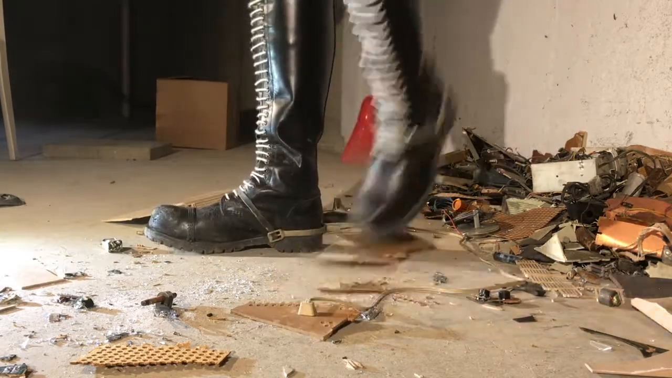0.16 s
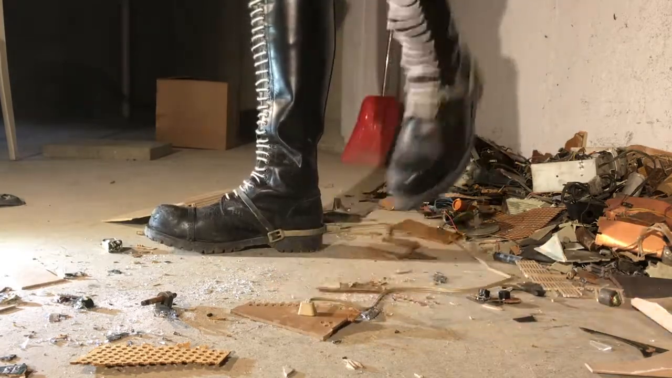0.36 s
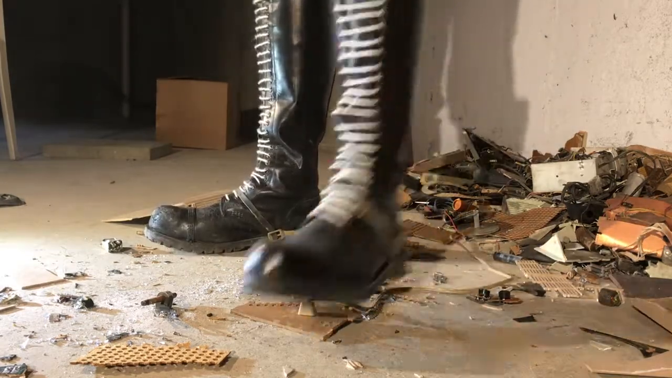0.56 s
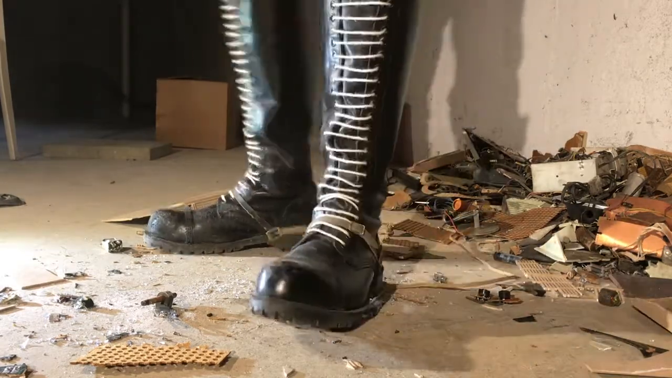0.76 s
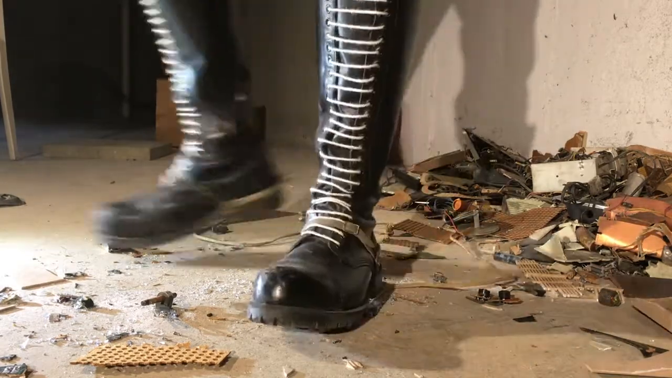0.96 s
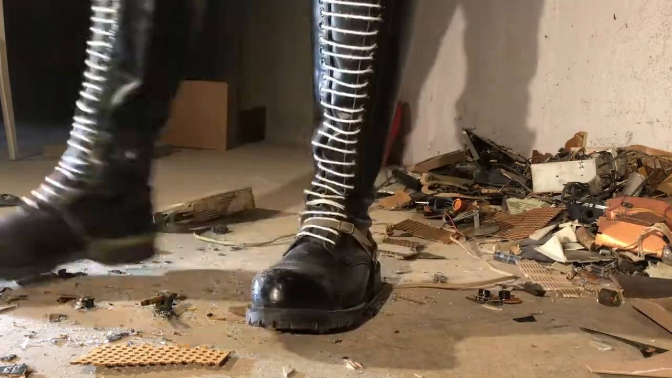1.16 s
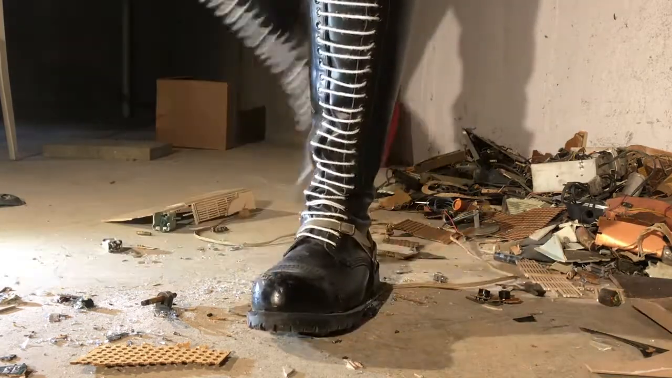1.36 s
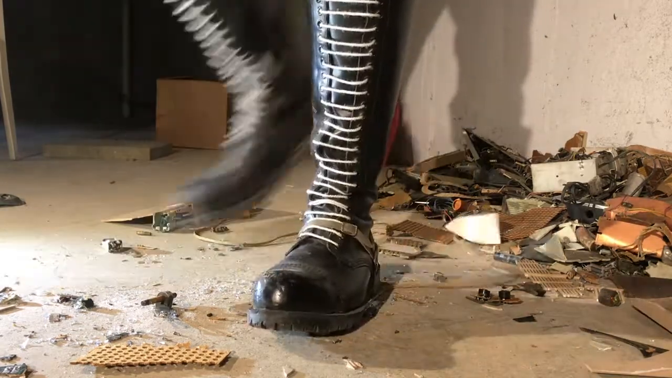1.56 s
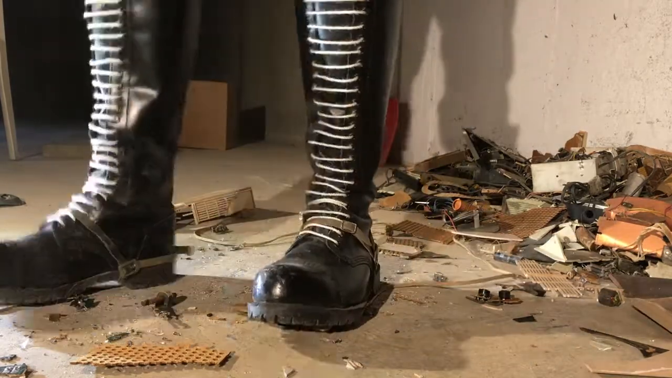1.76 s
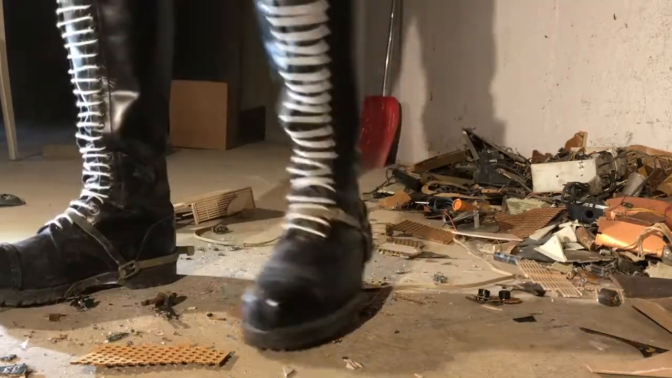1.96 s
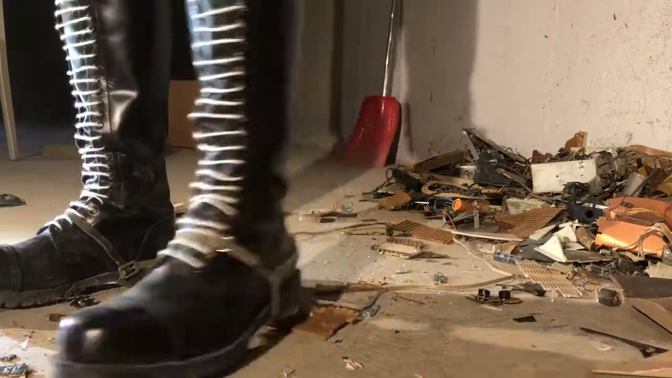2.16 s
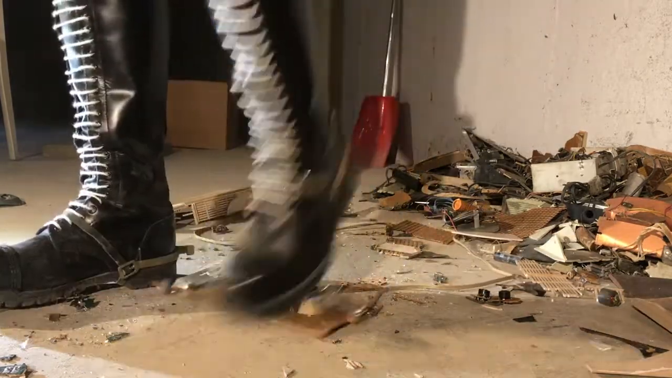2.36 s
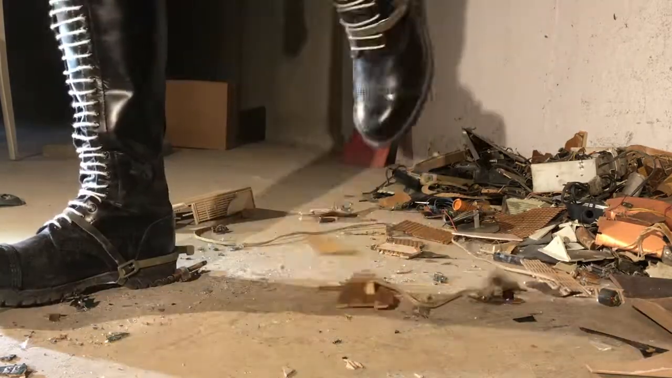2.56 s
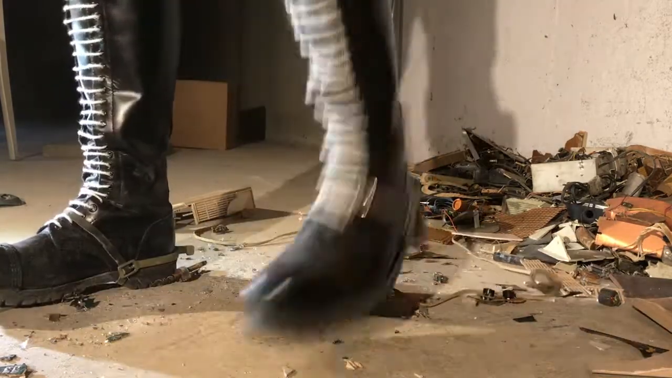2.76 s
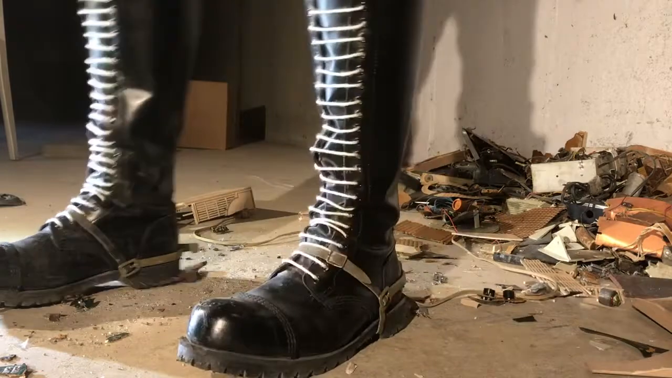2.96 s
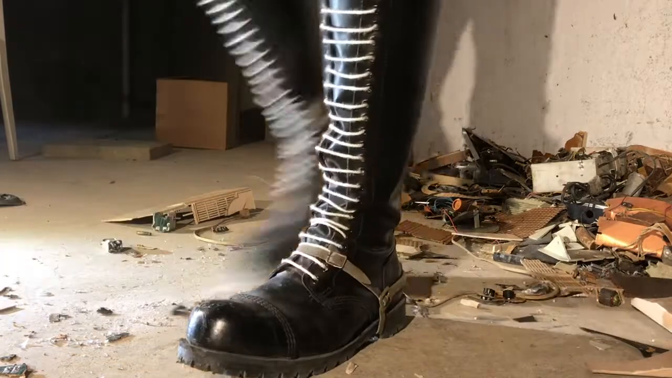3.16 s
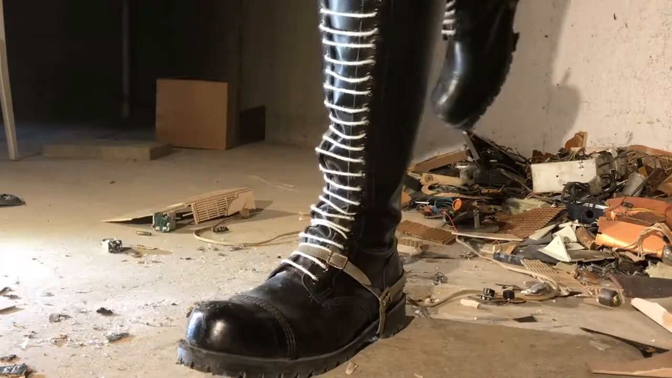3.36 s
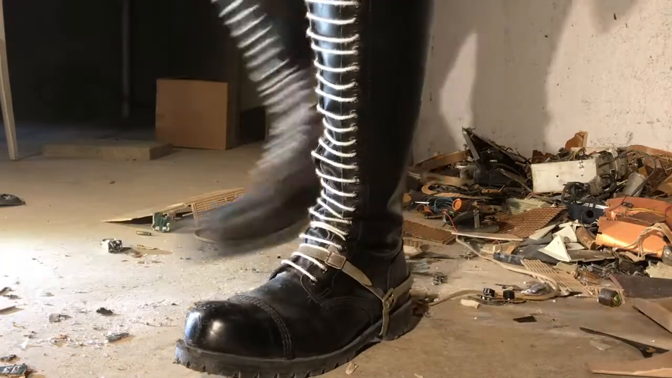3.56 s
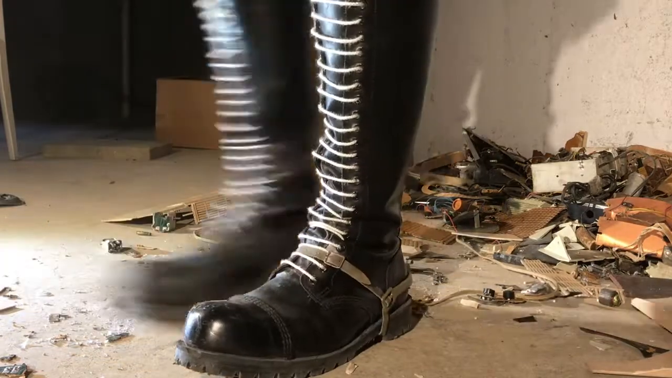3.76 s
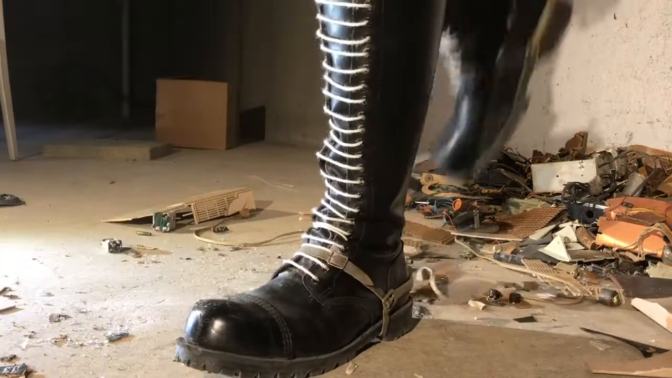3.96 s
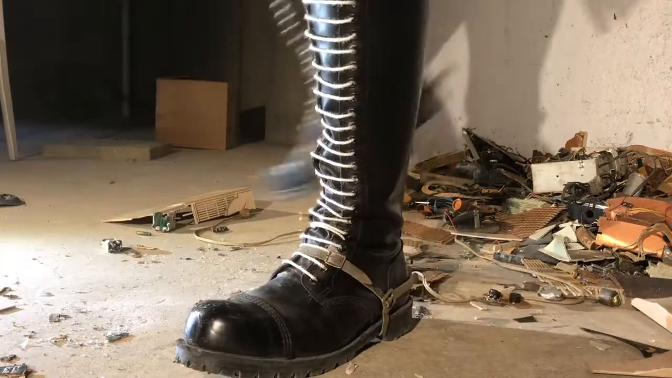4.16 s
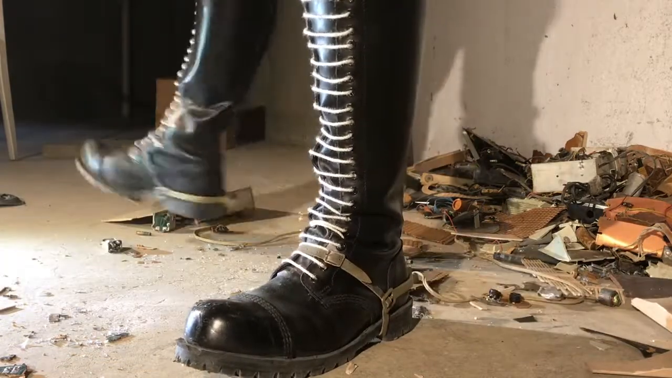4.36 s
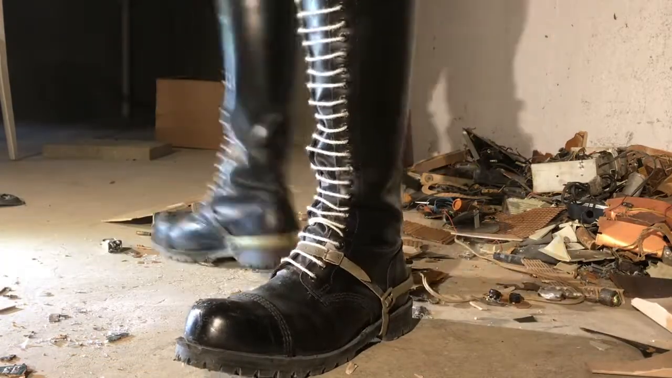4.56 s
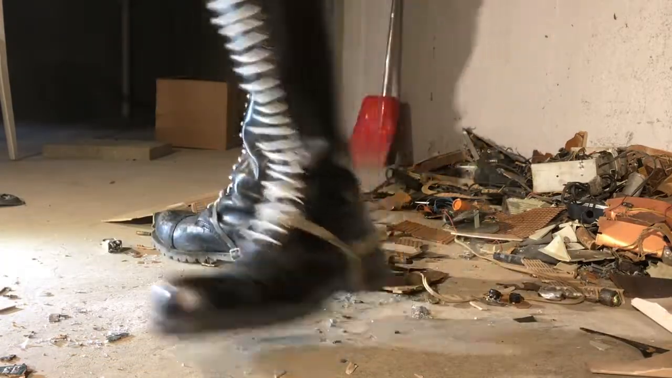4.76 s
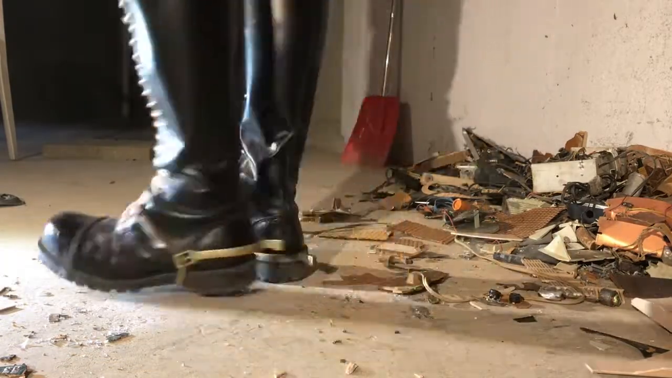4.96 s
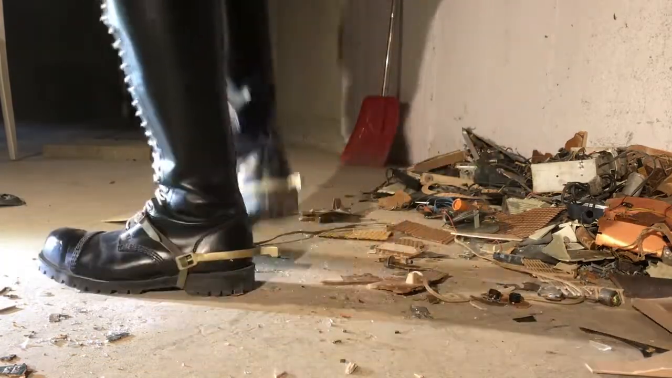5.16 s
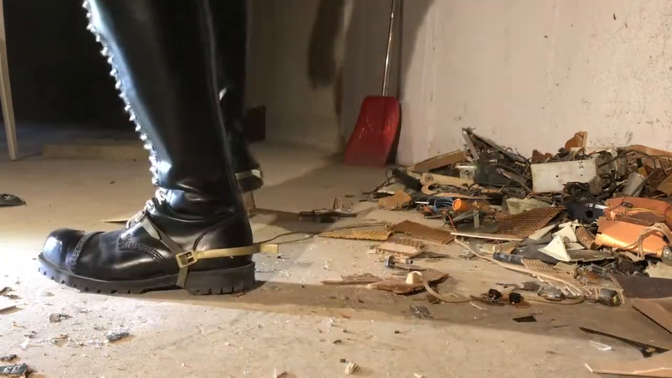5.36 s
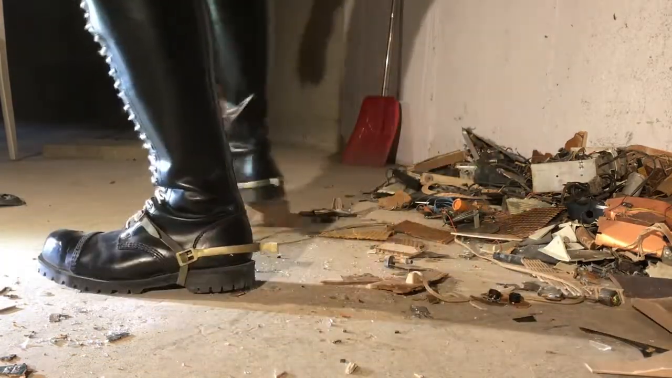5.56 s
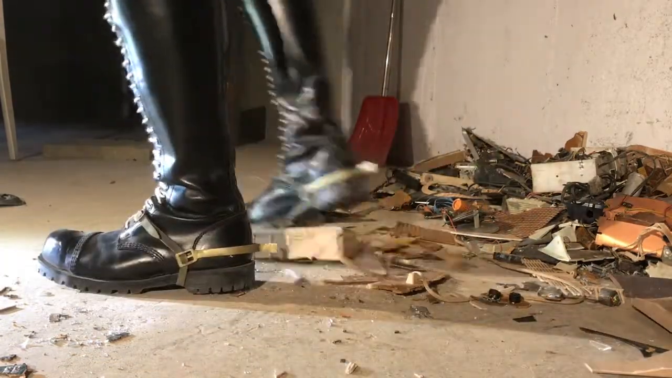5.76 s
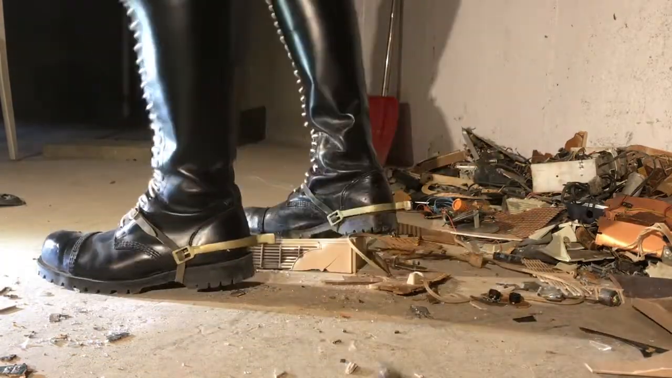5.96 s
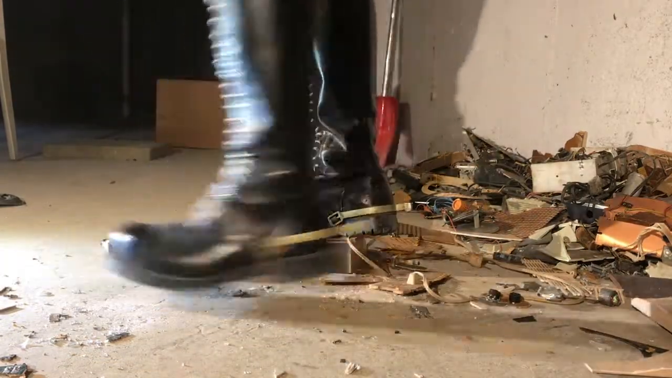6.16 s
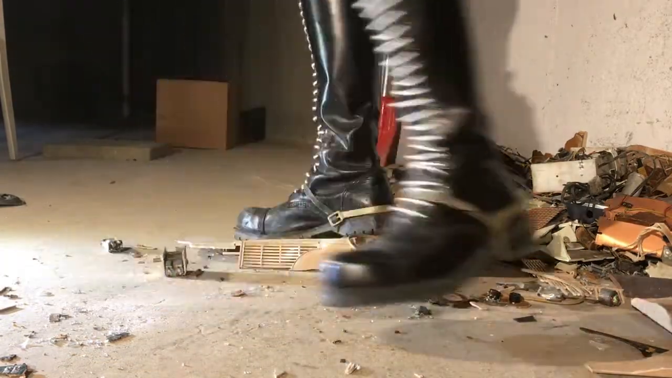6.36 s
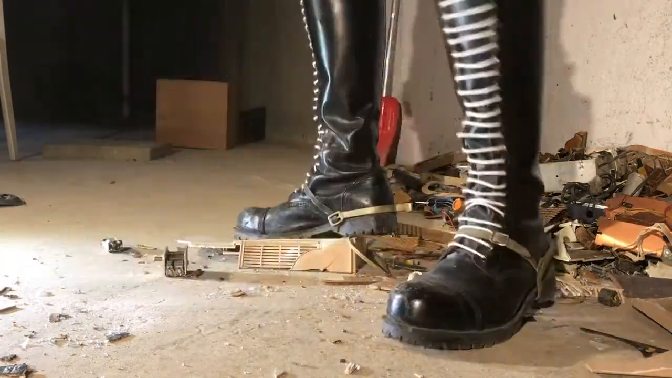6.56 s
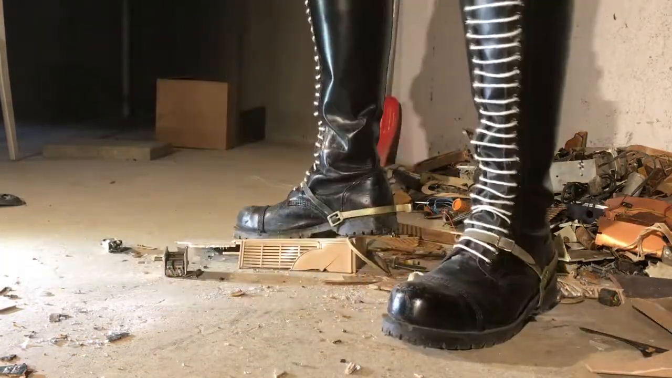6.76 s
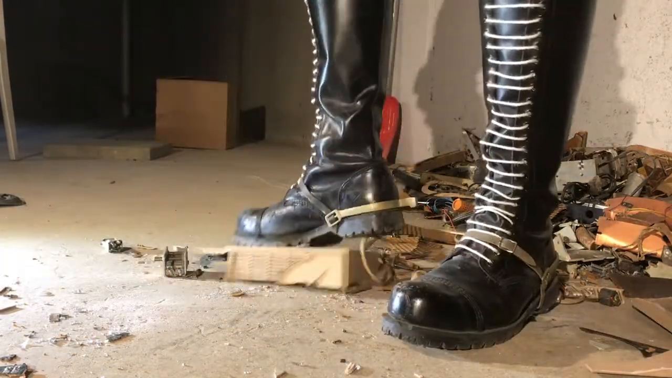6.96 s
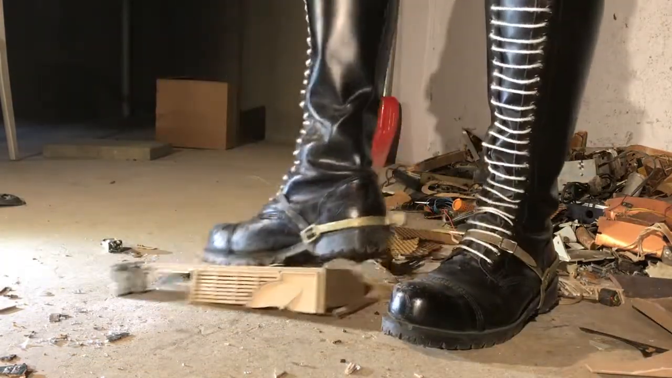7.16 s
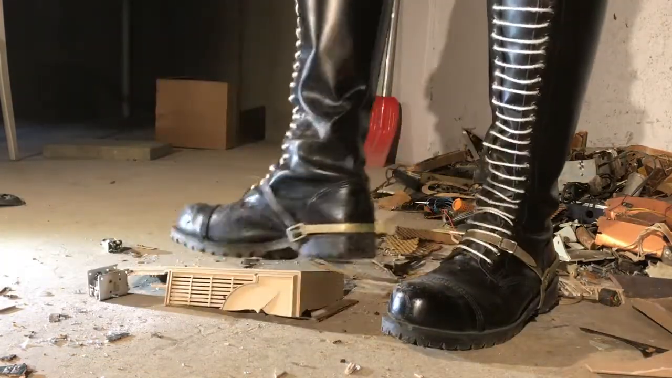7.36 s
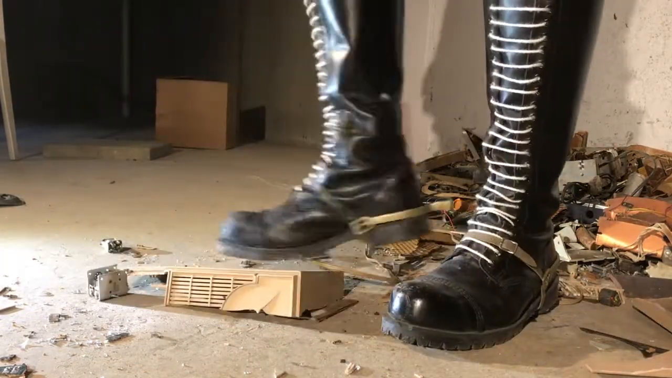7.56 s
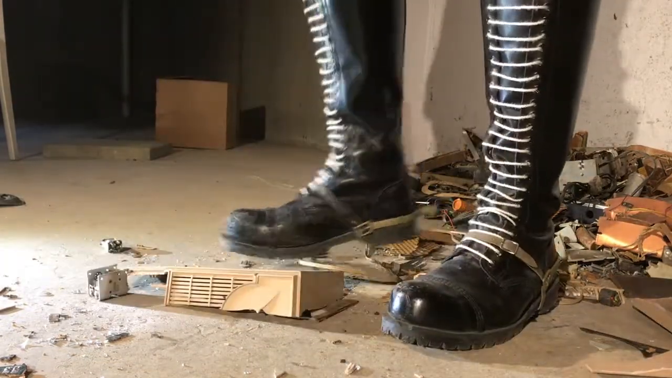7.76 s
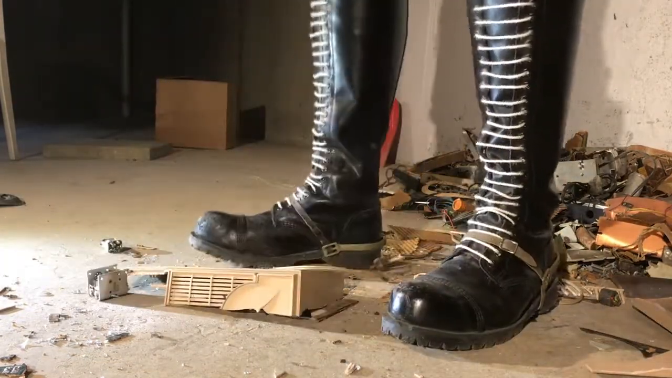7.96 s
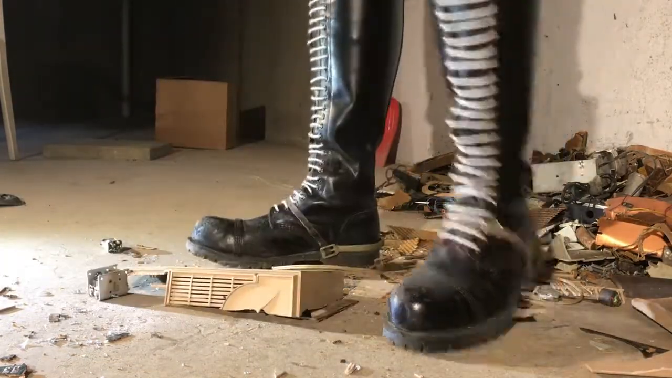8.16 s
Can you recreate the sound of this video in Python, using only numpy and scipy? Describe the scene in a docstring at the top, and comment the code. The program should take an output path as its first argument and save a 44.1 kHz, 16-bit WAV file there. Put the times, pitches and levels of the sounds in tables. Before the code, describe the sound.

Close to a concrete floor in a bare cellar, heavy rubber-soled boots thud and grind brittle plastic shards. Bright snaps and clicks scatter irregularly, crumbs skitter after kicks, and a metal bracket clatters early on. Later a small screw tinkles, then a hollow plastic case is dragged twice in stuttering scrapes. The end grows quiet. Short room tail, faint hum and hiss.

```python
"""Heavy boots step, scuff and kick among brittle plastic shards on a concrete floor in a bare cellar.
Sharp clicks of shards, heels, case and metal are noise bursts through resonators; soles thud as decaying
sines and grind as clumped grains. Small metal parts tinkle as struck modes; a hollow plastic case is
dragged twice, its shell and edge driven by stuttering contacts. A floor echo and diffuse tail form the
room; mains hum and hiss lie below."""
import sys
import numpy as np
from scipy import signal
from scipy.fft import rfft, irfft
from scipy.io import wavfile

SR = 44100
rng = np.random.default_rng(int(sys.argv[2]) if len(sys.argv) > 2 else 0)


def to_wav(sig):
    """Store sig (one row per channel, or 1-D mono) as 16-bit WAV at the path in sys.argv[1].

    Samples outside -1..1 are clipped; the rate is SR.
    """
    pcm = np.clip(np.atleast_2d(sig), -1, 1) * 32767
    pcm = np.round(pcm).astype(np.int16)
    wavfile.write(sys.argv[1], SR, pcm.T)  # frames by channels


N = 362061


def amp(db):
    """Amplitude factor of a level in dB."""
    return 10 ** (np.asarray(db) / 20)


def rms_one(x):
    """Scale to rms 1."""
    return x / np.sqrt(np.mean(x ** 2) + 1e-20)


def band(x, lo_hz, hi_hz):
    """Butterworth band-pass."""
    sos = signal.butter(2, [lo_hz, min(hi_hz, .45 * SR)], "band", fs=SR, output="sos")
    return signal.sosfilt(sos, x)


def high_pass(x, order, cutoff_hz):
    """Butterworth high-pass."""
    return signal.sosfilt(signal.butter(order, cutoff_hz, "high", fs=SR, output="sos"), x)


def colour(x, spectrum):
    """Shape by points (freq_hz, gain_db), interpolated over log frequency; rms 1."""
    bins_hz = np.fft.rfftfreq(N, 1 / SR) + 1
    freq_hz, gain_db = np.array(spectrum).T
    gain = amp(np.interp(np.log(bins_hz), np.log(freq_hz), gain_db))
    return rms_one(irfft(rfft(x) * gain, N))


def resonance(x, freq_hz, width_hz):
    """Two-pole resonator, gain 1 on top."""
    r = np.exp(-np.pi * width_hz / SR)
    zeros = np.array([1, 0, -1]) * (1 - r * r) / 2
    poles = [1, -2 * r * np.cos(2 * np.pi * freq_hz / SR), r * r]
    return signal.lfilter(zeros, poles, x)


def grains(per_s, spread_db, clump_db, clump_hz):
    """Random micro-contacts of uneven size that come in clumps; rms 1."""
    clumps = amp(clump_db * rms_one(band(rng.standard_normal(N), 8.0, clump_hz)))
    sizes = amp(spread_db * np.minimum(rng.exponential(1, N), 4)) * rng.standard_normal(N)
    struck = rng.random(N) < per_s / SR
    return rms_one(clumps * sizes * struck)


def crumbs(per_s, spread_db, q):
    """Separate tiny impacts: a dry tick, and a brief ring of one of 24 small fragments; rms 1."""
    taps = grains(per_s, spread_db, 3.0, 40)
    fragment = rng.integers(0, 24, N)
    pitches_hz = np.geomspace(2500, 14500, 24)
    # 1e-18 keeps the filters out of denormals
    rings = sum(resonance(taps * (fragment == k) + 1e-18, hz, hz / q) for k, hz in enumerate(pitches_hz))
    ticks = band(taps, 3200, 25000)
    return rms_one(rms_one(rings) + rms_one(ticks))


def add(out, start_s, burst, peak_db):
    """Lay a burst at start_s with the given peak."""
    i = round(start_s * SR)
    burst = burst[:N - i]
    out[i:i + len(burst)] += amp(peak_db) * burst / np.max(np.abs(burst))


# hiss spectrum: freq_hz, gain_db (relative)
HISS_SPECTRUM = [(25, -22), (70, 2.5), (98, -3), (250, -9), (700, -11.5), (2500, -21), (5000, -21),
                 (7500, -22.5), (8600, -20), (10300, -26.5), (15800, -22)]
HISS_RMS_DB = -57
HUM_HZ, HUM_RMS_DB = 120.6, -63.5


def background():
    """Steady hiss and rumble as coloured noise, mains hum as one sine."""
    hum = np.sqrt(2) * np.sin(2 * np.pi * HUM_HZ * np.arange(N) / SR)
    hiss = colour(rng.standard_normal(N), HISS_SPECTRUM)
    return amp(HISS_RMS_DB) * hiss + amp(HUM_RMS_DB) * hum


ROOM_T60_S, TAIL_DB = 0.39, -10.5   # tail energy re direct
TREBLE_T60_S, TREBLE_HZ = 0.24, 6000   # the walls soak up the treble sooner
FLOOR_ECHO_S, FLOOR_ECHO_DB = .003, -24


def room(x):
    """An echo off the floor, and a diffuse tail that builds over the first reflections."""
    t = np.arange(SR // 2) / SR
    noise = rng.standard_normal(SR // 2)
    tail = band(noise, 90, TREBLE_HZ) * amp(-60 * t / ROOM_T60_S)
    tail += band(noise, TREBLE_HZ, 21000) * amp(-60 * t / TREBLE_T60_S)
    tail *= 1 - np.exp(-(t / 0.004) ** 2)
    response = amp(TAIL_DB) * tail / np.sqrt(np.sum(tail ** 2))
    response[0] = 1
    response[round(FLOOR_ECHO_S * SR)] += amp(FLOOR_ECHO_DB)
    return signal.fftconvolve(x, response)[:N]


# small screw bouncing to rest: start_s, hit_db
SCREW_HITS = [(4.1832, -35), (4.2305, -46), (4.2767, -53), (4.315, -61)]
# its modes: freq_hz, mode_db, t60_s
SCREW_MODES = [(2900, -21, 0.28), (4850, -10, 0.064), (5570, -7, 0.11), (6260, -3, 0.11), (7600, -4, 0.14),
               (8500, 1, 0.12), (12420, -6, .08)]
# small metal part struck once: start_s, hit_db
SMALL_PART_HITS = [(3.7439, -36)]
# its modes: freq_hz, mode_db, t60_s
SMALL_PART_MODES = [(2630, -23, 0.12), (4830, -10, 0.08), (3670, -17.5, .08), (11400, 4, .06),
                    (6080, -6, 0.11), (6650, 11.5, 0.1), (9000, 7, 0.15), (9750, 3, 0.068),
                    (10880, 5, 0.087), (12890, 8, 0.075), (14560, -5.5, 0.09)]


def metal(hits, modes):
    """Each touch strikes every mode with a strength of its own; bent parts split each mode in two."""
    out = np.zeros(N)
    at = [round(start_s * SR) for start_s, _ in hits]
    hits_db = np.array(hits)[:, 1]
    luck_db = rng.normal(0, 3, (len(hits), 2 * len(modes)))
    twins = [(hz * 1.013, db - 4, t60_s * .7) for hz, db, t60_s in modes]
    for k, (freq_hz, mode_db, t60_s) in enumerate(modes + twins):
        clicks = np.full(N, 1e-18)
        clicks[at] = amp(hits_db + mode_db + luck_db[:, k])
        r, w = amp(-60 / (t60_s * SR)), 2 * np.pi * freq_hz / SR
        out += signal.lfilter([0, np.sin(w)], [1, -2 * r * np.cos(w), r * r], clicks)
    return out


# main hits of a kicked metal bracket: start_s, hit_db
BRACKET_HITS = [(1.3818, -30), (1.4194, -35), (1.5449, -33.5), (1.6415, -34.5), (1.698, -33.5)]
# its modes: freq_hz, mode_db, t60_s
BRACKET_MODES = [(1000, -21, .2), (1720, -6.5, 0.15), (2360, -11.5, 0.11), (5200, -19, 0.073),
                 (1970, -17, 0.11), (2820, -7.5, 0.14), (3660, -0.5, 0.11), (3830, -6, .12),
                 (4600, -16, .1), (5700, 0, .1), (6500, -3.5, 0.13), (8683, -8.5, 0.12)]


def tumble():
    """Hits of the bracket: between the main ones it keeps touching the floor lightly."""
    times_s = np.sort(rng.uniform(1.3, 1.8, 36))
    touches = [(s, -43 - 14 * (s - 1.3) - rng.exponential(4)) for s in times_s]
    return list(BRACKET_HITS) + touches


# hollow case over the floor, one list per drag: start_s, shell_db, edge_db
DRAGS = [
    [(5.493, -37, -38), (5.512, -22, -34.5), (5.595, -17, -24.5), (5.65, -14, -20), (5.73, -16, -20.5),
     (5.80, -20, -19.5), (5.87, -21.5, -29.5), (5.925, -45, -41.5), (6.04, -47, -38)],
    [(6.845, -44, -52.5), (6.89, -44, -43.5), (6.965, -18, -20.5), (7.13, -25.5, -30), (7.19, -27.5, -27),
     (7.215, -18, -24.5), (7.29, -26, -27.5), (7.35, -42, -35), (7.38, -48.5, -73), (7.43, -66, -62)],
]
# the edge catches and jumps: start_s, edge_db, shell_db, t60_s
JOLTS = [(5.509, -33.5, -15, 0.041), (5.6, -11.5, -17.5, 0.11), (5.69, -15, -21, 0.085),
         (5.81, -15.5, -39.5, 0.21), (5.933, -6.5, -3, 0.056), (6.94, -14.5, -25.5, 0.048),
         (6.957, -16, -23, 0.099), (6.995, -21, -23.5, .15), (7.025, -21, -31, 0.1),
         (7.07, -13.5, -21.5, 0.054), (7.1, -17, -24, 0.13), (7.21, -28.5, -31, 0.54)]
JOLT_RISE_S = .002
# shell resonances: freq_hz, width_hz, gain_db
CASE_MODES = [(132, 40, -16), (250, 52, -10), (436.4, 50, -8), (513, 33, -5), (694.5, 97, -1), (874, 62, 4),
              (966.5, 32.6, 3), (1139, 65, 1.5), (1424, 240, -11.5), (1830, 67, -4)]
# edge hiss spectrum: freq_hz, gain_db (relative)
EDGE_SPECTRUM = [(880, -43.5), (1500, -0.5), (3380, -0.5), (6360, -6), (7390, -11), (8600, -4),
                 (10300, -8.5), (15100, -6), (16000, -23.5), (16500, -29)]
CHATTER_SHARE = 0.46   # loose bits rattling on the dragged edge, re its hiss


def drags():
    """The case's edge stutters on the concrete: the same contacts, with coarser ones, hiss and drive the shell."""
    t = np.arange(N) / SR
    edge, shell = np.zeros((2, N))
    for rows in DRAGS:
        start_s, shell_db, edge_db = np.transpose(rows)
        edge += amp(np.interp(t, start_s, edge_db, left=-200, right=-200))
        shell += amp(np.interp(t, start_s, shell_db, left=-200, right=-200))
    for start_s, edge_db, shell_db, t60_s in JOLTS:
        jolt = np.clip((t - start_s) / JOLT_RISE_S, 0, 1) * amp(-60 * np.clip(t - start_s, 0, 1) / t60_s)
        edge += amp(edge_db) * jolt
        shell += amp(shell_db) * jolt
    contacts = grains(7000, 2.0, 2.0, 80) + .4 * grains(120, 2.5, 2.0, 30)
    body = np.zeros(N)
    for k, (freq_hz, width_hz, gain_db) in enumerate(CASE_MODES):
        body += (-1) ** k * amp(gain_db) * resonance(contacts, freq_hz, width_hz)
    chatter = colour(crumbs(1500, 1.5, q=60.0), EDGE_SPECTRUM)
    hiss = colour(contacts, EDGE_SPECTRUM)
    return edge * (hiss + CHATTER_SHARE * chatter) + shell * rms_one(body)


# loose crumbs skittering after a kick: start_s, end_s, start_level_db
SKITTERS = [(0.076, .46, -40.5), (0.66, 1.269, -49), (1.343, 1.908, -36.5), (2.023, 2.121, -48),
            (2.251, 2.846, -43), (2.918, 3.116, -69), (3.318, 3.696, -42.5), (3.9, 4.363, -50),
            (5.052, 5.202, -41.5), (6.022, 6.345, -41.5), (6.596, 6.759, -59), (7.883, 8.21, -53.5)]


def skitters():
    """Crumbs bounce on for a while, each run fading by 5.7 dB."""
    t, level = np.arange(N) / SR, np.zeros(N)
    for start_s, end_s, start_level_db in SKITTERS:
        progress = (t - start_s) / (end_s - start_s)
        level += amp(start_level_db - 5.7 * progress) * (t > start_s) * (t < end_s)
    return level * crumbs(600, 2.2, q=35.0)


# soles grinding grit and shards: start_s, rise_s, t60_s, grit_db, sole_db
SCUFFS = [(-0.01, 0.13, 0.26, -34, -45.5), (0.167, 0.0046, 0.043, -27, -51),
          (0.241, 0.01, 0.54, -43.5, -49), (0.372, 0.0094, 0.36, -45, -70),
          (0.706, 0.015, 0.68, -38.5, -55), (0.917, 0.0051, 0.36, -37, -65),
          (1.243, 0.062, 0.094, -12, -28.5), (1.34, 0.0086, 0.81, -36.5, -46),
          (1.813, 0.014, 0.034, -32, -34), (2.235, 0.039, 0.62, -47, -40), (2.286, 0.05, 0.24, -26, -30),
          (2.431, 0.0057, 0.05, -33, -34.5), (2.603, .01, 0.26, -37, -59),
          (2.896, 0.0022, 0.94, -44.5, -46), (3.031, 0.14, 0.22, -23.5, -27.5),
          (3.815, 0.02, 0.22, -27.5, -31), (3.915, 0.0037, 0.39, -36.5, -43.5),
          (4.604, 0.0041, 0.16, -23, -23), (5.062, 0.012, 0.44, -60, -47.5),
          (6.671, 0.015, 0.054, -51, -66), (7.859, 0.055, 0.64, -46.5, -47.5)]
SCUFF_HOLD_S = 0.016
# grit spectrum: freq_hz, gain_db (relative)
GRIT_SPECTRUM = [(880, -31), (1500, -5), (2330, -3.5), (2880, -5.5), (4610, -3), (7700, -7.5), (8770, -1),
                 (10300, -9), (15100, -7.5), (16000, -13), (16500, -39.5)]
# rubber sole spectrum: freq_hz, gain_db (relative)
SOLE_SPECTRUM = [(35, -52.5), (60, -36.5), (180, 16), (529, 10), (1120, 14), (1260, 14), (1610, 10),
                 (3000, -39.5), (3900, -41), (6600, -120)]


def scuffs():
    """Pressure swells, holds and lets go; grit crackles under the sole while the rubber rumbles."""
    t = np.arange(N) / SR
    grit, sole = np.zeros((2, N))
    for start_s, rise_s, t60_s, grit_db, sole_db in SCUFFS:
        swell = np.clip((t - start_s) / rise_s, 0, 1) ** 2
        release = amp(-60 * np.clip(t - start_s - rise_s - SCUFF_HOLD_S, 0, 3) / t60_s)
        grit += amp(grit_db) * swell * release
        sole += amp(sole_db) * swell * release
    crackle = colour(grains(5000, 2.0, 2.5, 90), GRIT_SPECTRUM) + .6 * crumbs(900, 3.0, q=30.0)
    rumble = colour(grains(3000, 2.0, 2.0, 70), SOLE_SPECTRUM)
    return grit * crackle + sole * rumble


# soles meeting the floor, peaks before the high-pass: start_s, thud_peak_db, thud_hz, boom_peak_db
STEPS = [(0.15, -20.5, 180, -40), (0.182, -22, 197, -40.5), (0.665, -21.5, 183, -36),
         (1.268, -17, 427, -37), (1.321, -18, 340, -37), (1.846, -23, 201, -44), (2.234, -22.5, 140, -34.5),
         (2.360, -14, 215, -40), (2.899, -8.5, 340, -24), (3.639, -34.5, 345, -51),
         (3.832, -11.5, 352, -43), (3.902, -17, 250, -38), (4.61, -17, 345, -38), (5.063, -22.5, 319, -42),
         (5.611, -21, 250, -29), (6.348, -28.5, 424, -55), (6.547, -23, 311, -42.5), (7.841, -36, 510, -71),
         (8.062, -50, 514, -54)]
THUD_T60_S = 0.032
BOOM_HZ, BOOM_T60_S, BOOM_RISE_S = 67, 0.11, 0.007   # the floor's answer


def steps():
    """A rubber sole lands: a damped thud with a rough skin, and the floor booms."""
    out, t = np.zeros(N), np.arange(9000) / SR
    boom = amp(-60 * t / BOOM_T60_S) * (1 - np.exp(-t / BOOM_RISE_S)) * np.sin(2 * np.pi * BOOM_HZ * t)
    for start_s, thud_db, thud_hz, boom_db in STEPS:
        skin = rms_one(band(rng.standard_normal(9000), 68, 710))
        thud = amp(-60 * t / THUD_T60_S) * (np.sin(2 * np.pi * thud_hz * t) + skin)
        add(out, start_s, thud, thud_db)
        add(out, start_s, boom, boom_db)
    return high_pass(out, 4, 60)


# sharp clicks: shards snapping or landing, heel clicks, cracks of the dragged case, metal clinks:
# start_s, ring_peak_db, pitch_hz
CLICKS = [(0.167, -7, 10200), (0.1825, -5.5, 8100), (0.2334, -17, 1160), (0.2711, -14, 2400),
          (0.284, -13, 8550), (0.3166, -21, 8900), (0.378, -13, 9000), (0.385, -16, 6820),
          (0.6626, -25, 1390), (0.7287, -21, 4370), (0.7603, 5.5, 6000), (0.7624, -11.5, 4600),
          (0.788, -2.5, 5800), (0.85, -26, 1470), (0.8878, -2.5, 5230), (0.9308, -1, 5700),
          (0.943, -4, 5200), (1.051, -26.5, 6160), (1.0804, -20, 8200), (1.112, -28, 6500),
          (1.223, -23.5, 8500), (1.269, -2.5, 8460), (1.417, -10.5, 5800), (1.465, -18, 6570),
          (1.5218, -14.5, 4730), (1.561, -16.5, 12100), (1.5898, -15, 5700), (1.6424, -17, 3860),
          (1.7006, -6.5, 9600), (1.806, -10.5, 6070), (1.8311, -24, 3160), (1.923, -24.5, 2730),
          (2.0528, -16, 1550), (2.085, -15, 2060), (2.1978, -19, 7450), (2.2339, -17, 2000),
          (2.244, -10.5, 8600), (2.2638, -16, 8550), (2.2786, -17, 9000), (2.3154, -6.5, 6500),
          (2.32, -24, 2500), (2.3468, -13, 2390), (2.4479, -8.5, 3000), (2.4653, -12.5, 9500),
          (2.5054, -24, 9220), (2.6176, -3, 6640), (2.643, -5.5, 7600), (2.7686, -13, 6080),
          (2.887, -23, 4930), (2.9, -9, 1240), (2.9197, -11.5, 5150), (2.967, -20, 5000),
          (3.0734, -26, 11500), (3.3413, -19.5, 8200), (3.3587, -17, 10600), (3.4015, -14, 10600),
          (3.421, -16.5, 8400), (3.477, -18, 9200), (3.5284, -26, 8700), (3.588, -17, 9200),
          (3.605, -24, 10600), (3.647, -33, 12000), (3.744, -22, 9000), (3.8195, -5.5, 11600),
          (3.833, -6, 1780), (4.022, -30.5, 12000), (4.0376, -20.5, 8600), (4.067, -23, 10000),
          (4.08, -24, 5200), (4.1804, -18.5, 12000), (4.6084, -7, 1620), (4.7049, -19, 3500),
          (4.7162, -10.5, 2160), (4.909, -38.5, 7000), (5.0548, -29, 1480), (5.1069, -10, 1550),
          (5.1591, -13.5, 1520), (5.1723, -24, 1790), (5.32, -41.5, 7000), (5.9346, -6, 3940),
          (5.9678, -4, 11900), (6.1233, -21, 10400), (6.1473, -17, 5000), (6.2043, -24, 9500),
          (6.2976, -27.5, 3890), (6.548, -30, 1540), (6.595, -38, 7000), (6.692, -29.5, 5200),
          (6.701, -32, 5200), (6.72, -37.5, 5200), (6.844, -27.5, 1750), (6.893, -15.5, 1610),
          (7.635, -30.5, 7860), (7.644, -35.5, 6000), (7.87, -35, 2010), (7.997, -44, 10000),
          (8.0616, -18.5, 1000), (8.168, -39, 10900)]
CLICK_T60_S, CRACKS_PER_S = 0.03, 900
PARTIAL_DB, PARTIAL_Q = -6.5, 15   # three thin partials each
# lower-pitched clicks, heels among them, sound duller, higher ones brighter;
# peaks re ring at 4 kHz pitch, slopes per octave of pitch
DULL_DB, DULL_DB_PER_OCTAVE = -19.5, -8.5
BRIGHT_DB, BRIGHT_DB_PER_OCTAVE = -12.5, 9


def sharp_clicks():
    """A sharp onset, a few after-cracks, a short ring with thin partials, a dull and a bright part."""
    out, t = np.zeros(N), np.arange(3000) / SR
    for start_s, peak_db, pitch_hz in CLICKS:
        cracks = rng.random(3000) < CRACKS_PER_S / SR
        force = rng.standard_normal(3000) * (0.63 + 2.0 * cracks) * amp(-60 * t / CLICK_T60_S)
        force[0] = 5.0   # the onset
        partials_hz = pitch_hz * rng.uniform(.55, 1.3, 3)
        partials = amp(PARTIAL_DB) * sum(resonance(force, hz, hz / PARTIAL_Q) for hz in partials_hz)
        ring = resonance(force, pitch_hz, .3 * pitch_hz) + .3 * band(force, 1500, 9000) + partials
        octaves = np.log2(pitch_hz / 4000)
        add(out, start_s, ring, peak_db)
        add(out, start_s, band(force, 210, 1700), peak_db + DULL_DB + DULL_DB_PER_OCTAVE * octaves)
        add(out, start_s, band(force, 9500, 15000), peak_db + BRIGHT_DB + BRIGHT_DB_PER_OCTAVE * octaves)
    return out


def scene():
    """Everything near the floor sounds in the room, over the background."""
    near = drags() + skitters() + scuffs() + steps() + sharp_clicks()
    near += metal(SCREW_HITS, SCREW_MODES) + metal(SMALL_PART_HITS, SMALL_PART_MODES)
    near += metal(tumble(), BRACKET_MODES)
    return (room(near) + background())[None]


CUTOFF_HZ = 15900


def record(dry):
    """The deepest bass is lost, peaks are cut off at 0.9 of full scale, then the top is cut."""
    lean = high_pass(dry, 2, 40)
    low_pass = signal.ellip(10, .5, 90, CUTOFF_HZ, fs=SR, output="sos")
    return signal.sosfilt(low_pass, np.clip(lean, -.9, .9))


dry = scene()
out = record(dry)
to_wav(out)
```